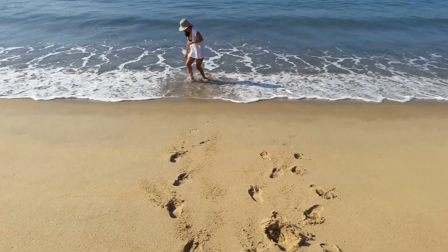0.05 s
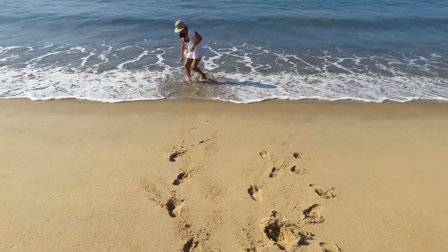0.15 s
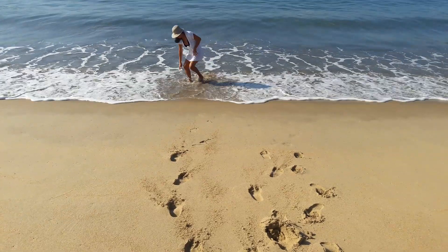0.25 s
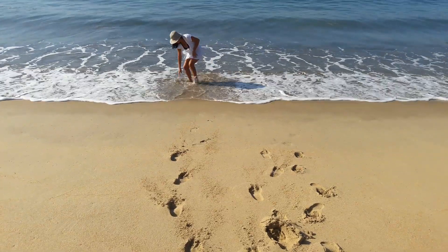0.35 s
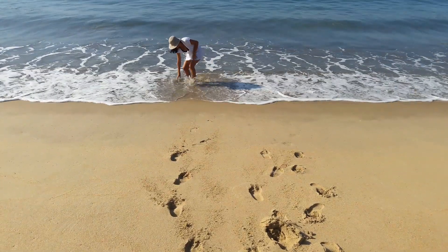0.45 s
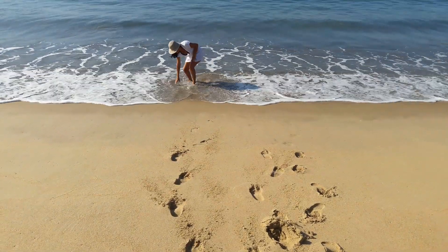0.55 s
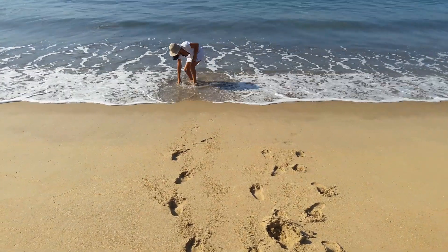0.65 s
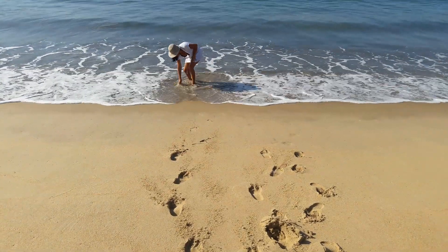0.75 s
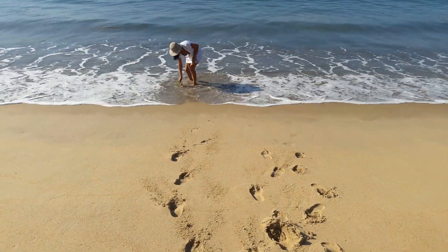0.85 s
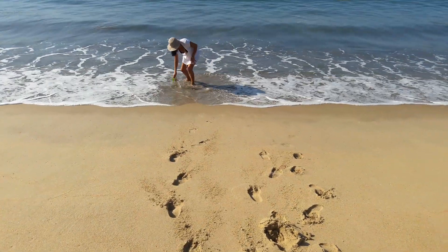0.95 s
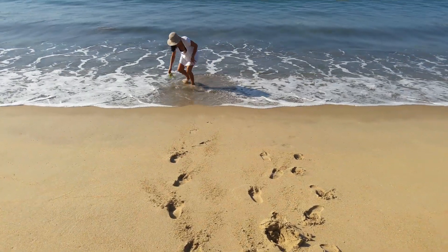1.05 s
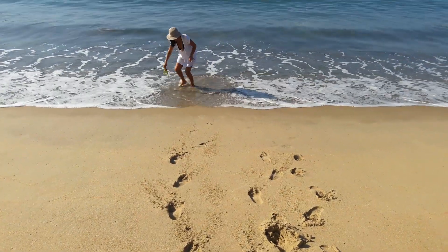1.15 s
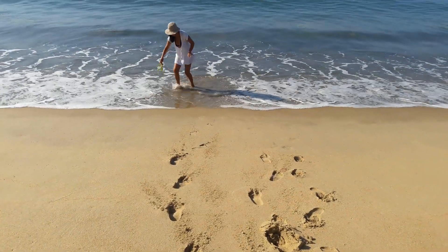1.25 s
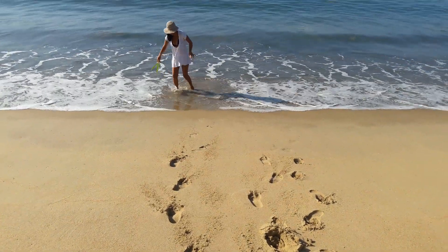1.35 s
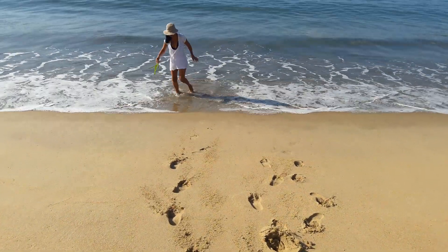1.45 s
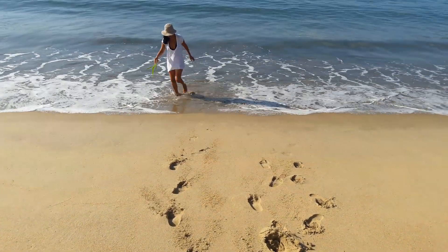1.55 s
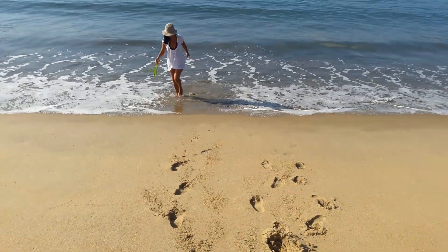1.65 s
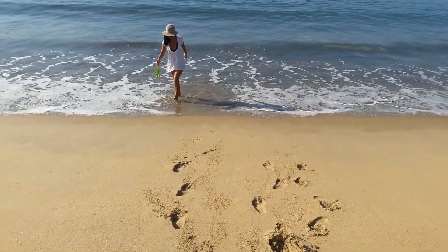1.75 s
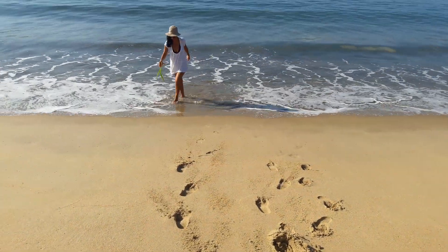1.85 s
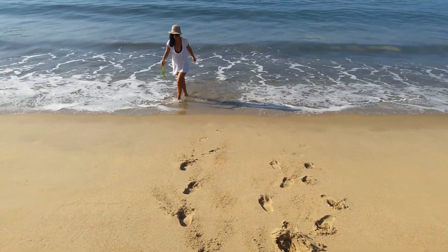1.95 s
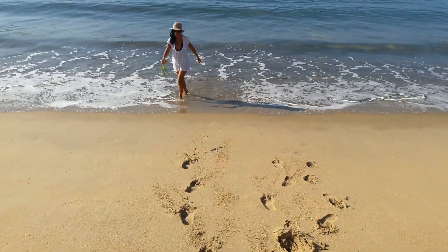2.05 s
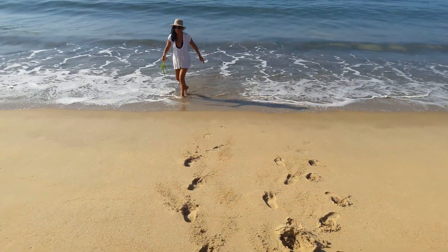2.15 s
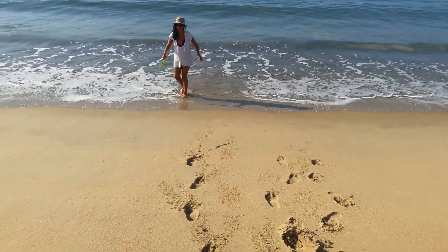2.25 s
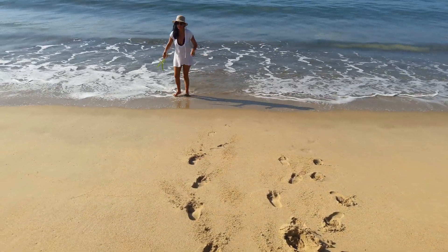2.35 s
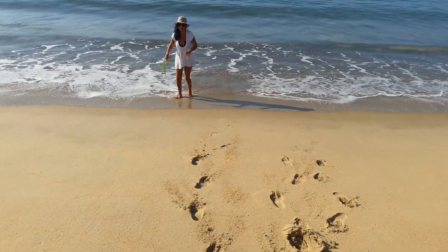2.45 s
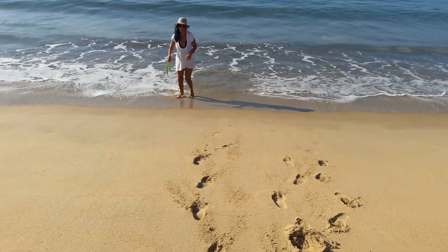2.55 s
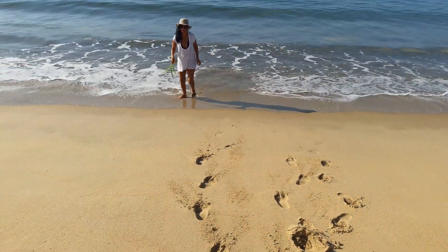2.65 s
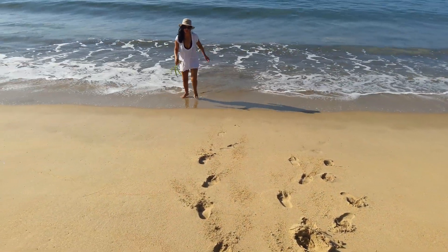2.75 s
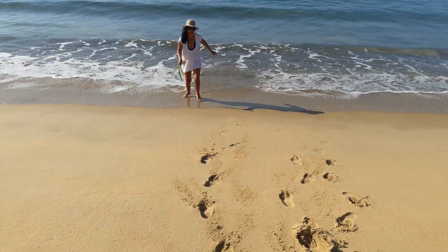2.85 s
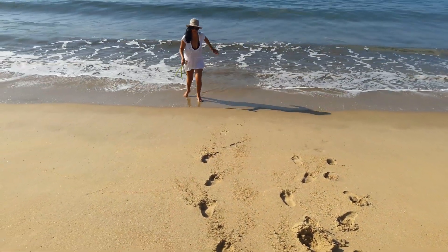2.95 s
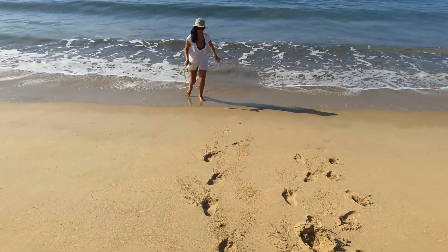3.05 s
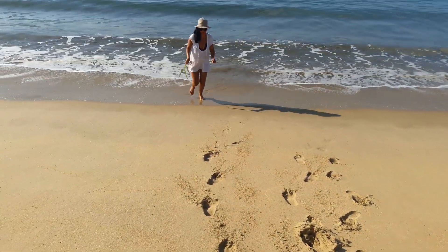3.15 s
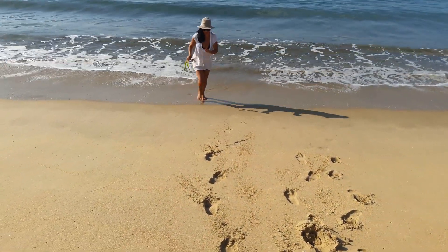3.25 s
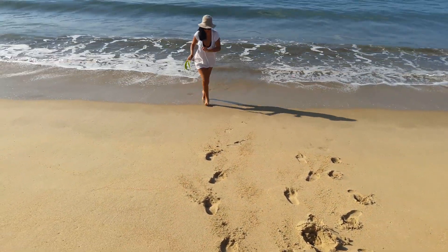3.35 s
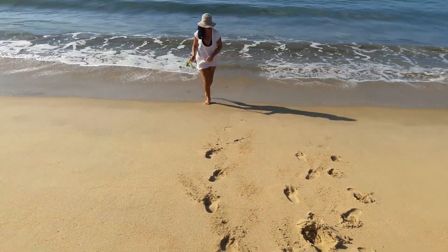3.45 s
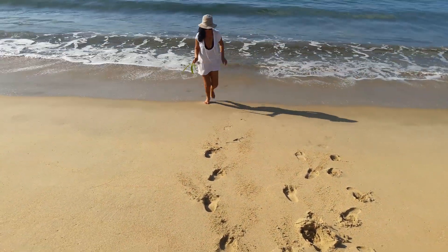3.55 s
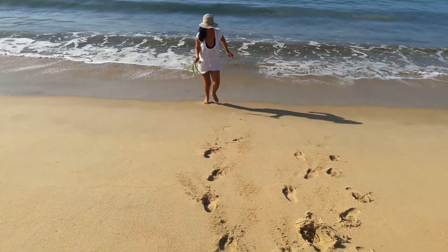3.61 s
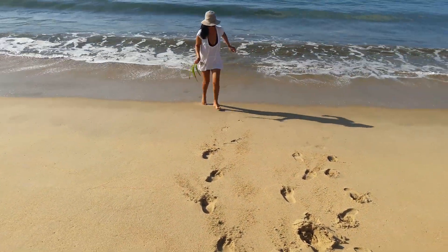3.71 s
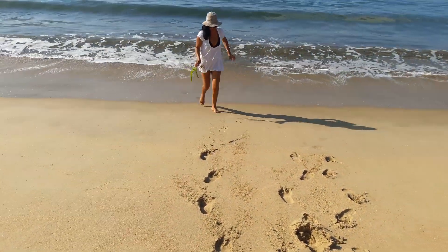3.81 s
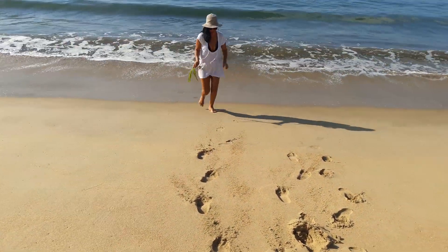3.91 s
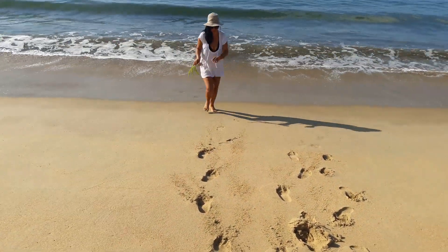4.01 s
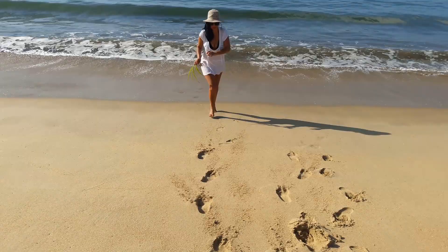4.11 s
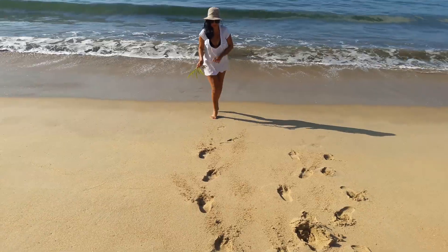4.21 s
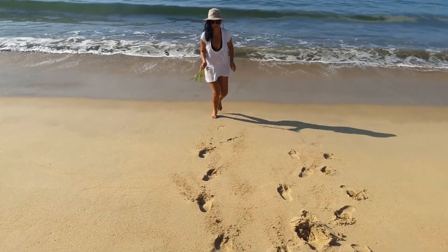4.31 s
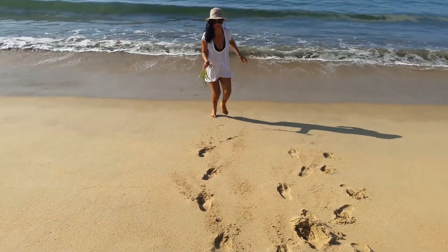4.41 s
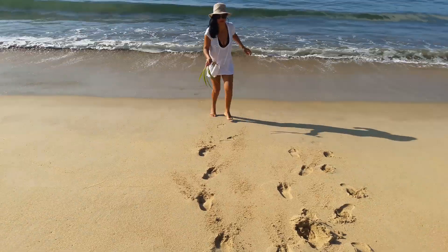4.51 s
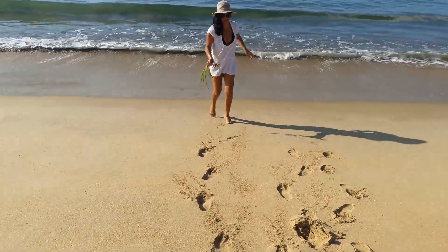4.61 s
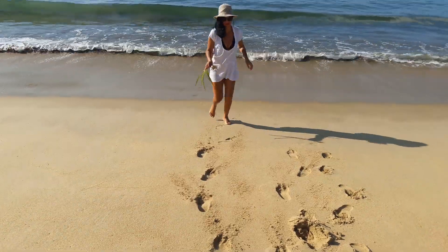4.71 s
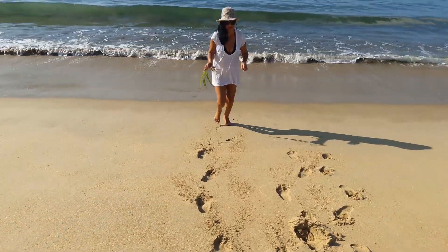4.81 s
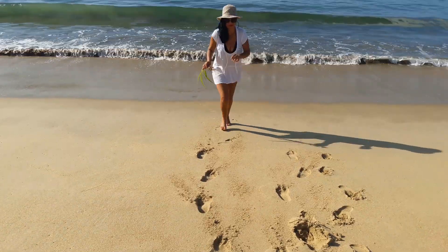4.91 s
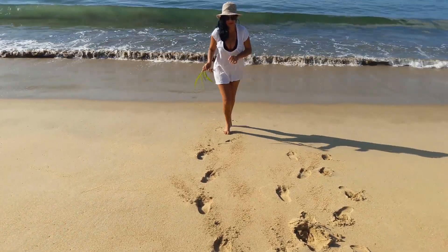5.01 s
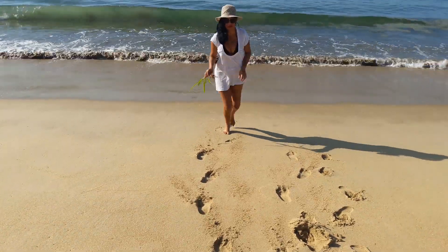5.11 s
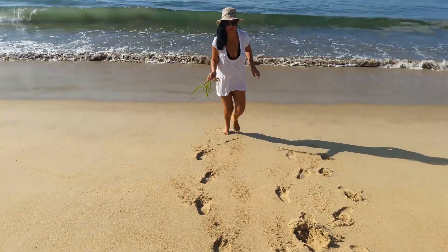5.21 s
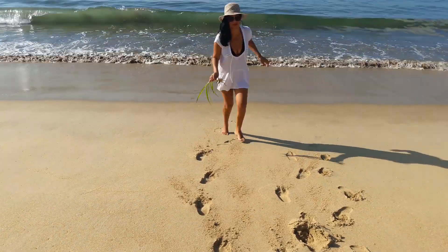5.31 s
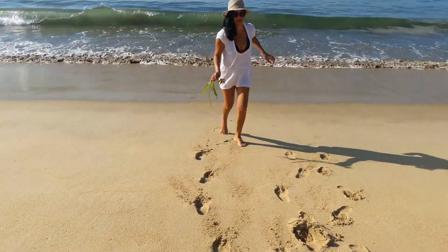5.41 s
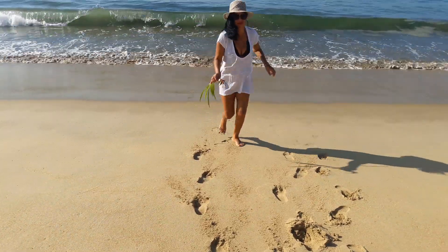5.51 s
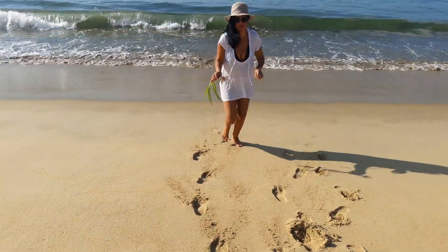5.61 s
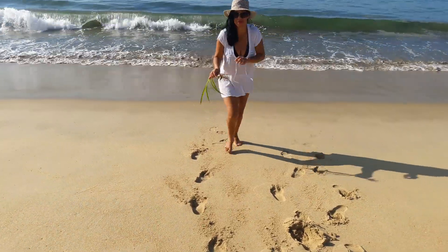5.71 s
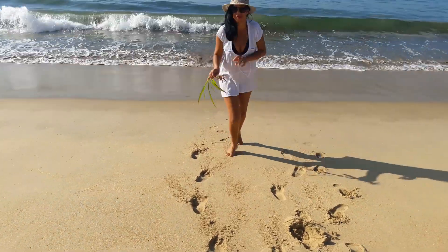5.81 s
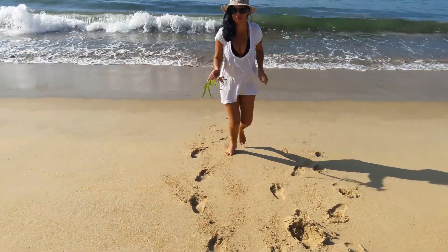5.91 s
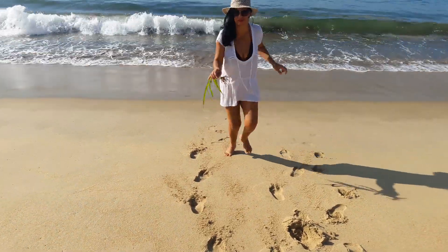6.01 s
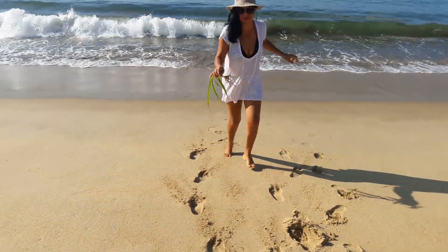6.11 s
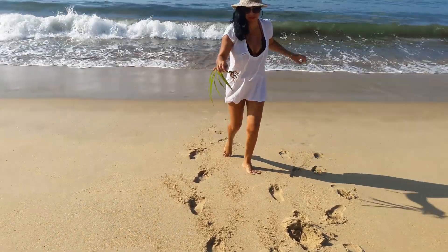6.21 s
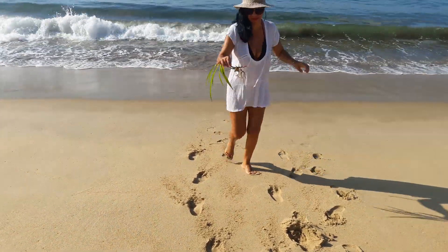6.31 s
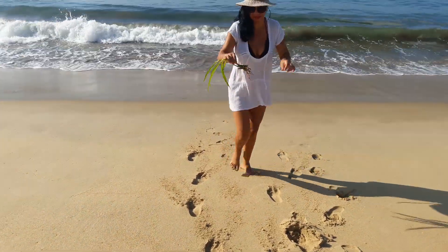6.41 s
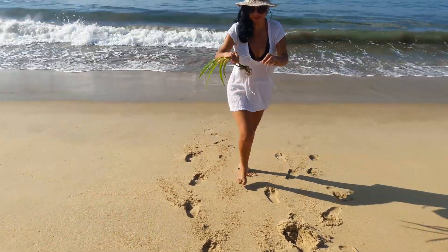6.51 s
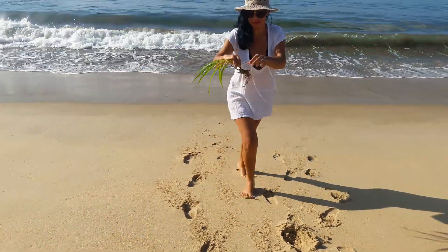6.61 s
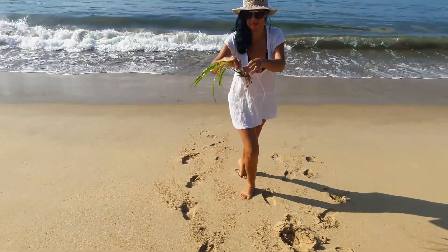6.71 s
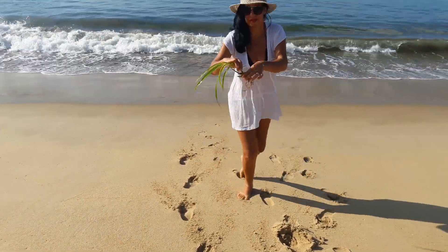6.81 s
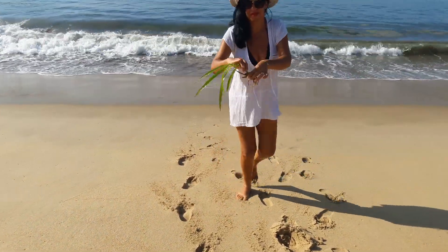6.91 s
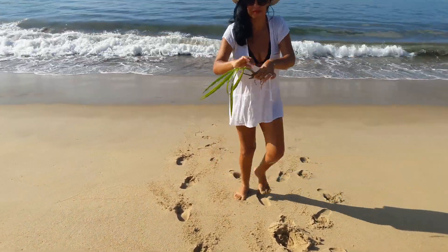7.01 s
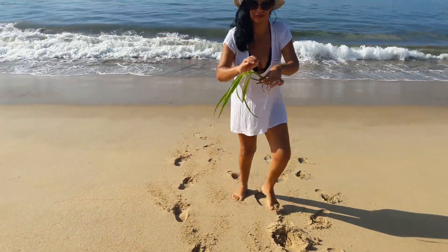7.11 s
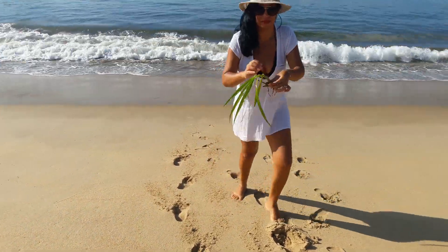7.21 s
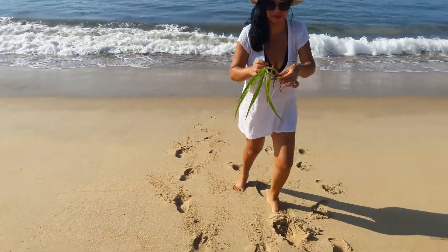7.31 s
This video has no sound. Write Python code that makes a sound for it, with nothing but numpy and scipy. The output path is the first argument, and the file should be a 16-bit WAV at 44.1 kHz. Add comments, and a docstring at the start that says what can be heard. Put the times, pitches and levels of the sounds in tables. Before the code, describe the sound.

Soft beach wash with small laps and plops thins out before a new wave gurgles, slaps down and crashes into loud, hissing whitewater.

```python
"""Surf on a sandy beach, a few metres from the waterline. A spent wave fizzes and laps round wading feet,
drains back over the sand, and the next wave curls, plops and breaks into a roar of bubbles and spray.
The water is ringing bubbles over coloured noise, plops are decaying tones, slaps are showers of clicks.
Draining water is noise with a short inverted echo; far surf, a light wind and the hiss of the small
microphone are coloured noise. The microphone port colours the treble."""
import sys
import numpy as np
from scipy import signal
from scipy.fft import rfft, irfft, next_fast_len
from scipy.io import wavfile

SR = 44100
rng = np.random.default_rng(int(sys.argv[2]) if len(sys.argv) > 2 else 0)


def dump_mix(stems):
    """Bounce the given channels to the path in sys.argv[1] as a 16-bit WAV at rate SR."""
    frames = np.atleast_2d(stems).T  # one column per channel
    limited = np.clip(frames, -1, 1)  # hard clip at full scale
    pcm = np.round(limited * 32767).astype(np.int16)
    wavfile.write(sys.argv[1], SR, pcm)


N = 324569
TIME = np.arange(N) / SR
BREAK_S = 5.216  # the new wave breaks

# how much of the lift from a collapsing crest each part takes: part -> share of the dB
COLLAPSE_SHARE = {"churn": 0.55, "fizz": .9, "boom": 0.62}


def from_db(db):
    """Decibels to gain."""
    return 10 ** (np.asarray(db) / 20)


def rms_one(x):
    """Scale to unit rms."""
    return x / np.sqrt(np.mean(x ** 2) + 1e-20)


def noise():
    """White noise for the whole scene."""
    return rng.standard_normal(N)


def filtered(x, order, hz, kind="low"):
    """Pass x through a Butterworth filter."""
    return signal.sosfilt(signal.butter(order, hz, kind, fs=SR, output="sos"), x)


def coloured(x, spectrum):
    """Shape x by a spectrum drawn over log frequency; rms 1."""
    hz, db = np.transpose(spectrum)
    size = next_fast_len(N)
    bins = np.maximum(np.fft.rfftfreq(size, 1 / SR), 1)
    gain = from_db(np.interp(np.log(bins), np.log(hz), db, left=-90, right=-90))
    return rms_one(irfft(rfft(x, size) * gain, size)[:N])


def drift(rate):
    """Smooth random wander that changes about rate times a second; spread 1."""
    step = 40  # samples between points of the slow curve
    r = np.exp(-2 * np.pi * rate * step / SR)
    settle = 2000  # points dropped while the filter settles
    kicks = rng.standard_normal(N // step + 2 + settle)
    slow = signal.lfilter([1], [1, -2 * r, r * r], kicks)[settle:]
    return np.interp(np.arange(N) / step, np.arange(len(slow)), rms_one(slow))


def bump(s, length):
    """A smooth rise and fall of height 1 around time s."""
    return np.exp(-np.minimum(((TIME - s) / length) ** 2, 50))


def add(out, s, sound):
    """Mix a short sound in at time s."""
    at = max(int(s * SR), 0)
    out[at:at + len(sound)] += sound[:max(N - at, 0)]


def hiss_at(hz, width_hz):
    """A noisy resonance around a pitch that may move; rms 1."""
    low = filtered(rng.standard_normal((2, N)), 2, width_hz / 2)
    phase = 2 * np.pi * np.cumsum(hz * np.ones(N)) / SR
    return rms_one(low[0] * np.cos(phase) + low[1] * np.sin(phase))


def new_wave(part):
    """Gain of one part of the breaking wave: it builds, holds, then changes at its own rate."""
    # (full after the break [s], full level [dB], rise [dB/s], hold [s], fall [dB/s]); negative falls grow
    envelopes = {"rumble": (0.28, -24.5, 14, 1.1, 4.3), "boom": (0.62, -32, 10.5, 0.5, 12),
                 "tumble": (.25, -32, 22, 0.5, -.5), "splash": (.0, -34.5, 26, 0.5, 3),
                 "fizz": (.0, -41, 24, 1.2, 4.5), "foam": (-0.5, -55.5, 12, 4, .5),
                 "backwash": (-0.77, -43, 13.5, 0.7, 70)}
    # when each part of the new wave is first heard: part -> time [s]
    entries = {"rumble": 3.25, "boom": 3.55, "tumble": 3.55, "splash": 4.7, "fizz": 4.7, "foam": 4.7,
               "backwash": 3.35}
    delay_s, full_db, rise, hold_s, fall = envelopes[part]
    t = TIME - BREAK_S - delay_s
    fade_in = np.clip((TIME - entries[part]) / 0.14, 0, 1)
    level_db = full_db - rise * np.maximum(-t, 0) - fall * np.maximum(t - hold_s, 0)
    return fade_in * from_db(level_db)


def spent_wave(part):
    """Gain of one part of the wave that has already run up the beach and is dying away."""
    # part -> (level at the start [dB], fall [dB/s])
    decays = {"rumble": (-51.5, 2.7), "boom": (-54.5, 1.7), "tumble": (-55, 6), "splash": (-56, 1.67),
              "fizz": (-57, 2.6), "foam": (-62, 3.9)}
    start_db, fall = decays[part]
    return from_db(start_db - fall * TIME)


def both_waves(part):
    """Gain of one part as the spent wave fades and the new one takes over."""
    return np.hypot(spent_wave(part), new_wave(part))


def collapse_db():
    """Lift in dB as one stretch of the crest after another falls and throws up spray."""
    # (time [s], lift [dB], length [s])
    collapses = [(4.875, 4.5, 0.12), (5.17, 2, 0.058), (5.294, 4, 0.088), (5.77, 3, 0.16), (6.253, 2, 0.21),
                 (7.19, 3, .07)]
    return sum(db * bump(s, length) for s, db, length in collapses)


def bubbles(low_hz, high_hz, per_s, cycles, size_db, clump_db, count=16):
    """Bubbles of many pitches and strengths are born in clumps; each rings for a few cycles."""
    out = np.zeros(N)
    for hz in np.geomspace(low_hz, high_hz, count):
        birth_chance = per_s / count / SR * from_db(clump_db * drift(8))
        born = np.flatnonzero(rng.random(N) < birth_chance)
        strength_db = size_db * np.minimum(rng.exponential(1, len(born)), 4)
        kicks = np.zeros(N)
        kicks[born] = from_db(strength_db) * rng.choice([-1, 1], len(born))
        # a two-pole resonator that falls 60 dB in the given cycles
        r = np.exp(-np.log(1000) * hz / (cycles * SR))
        w = 2 * np.pi * hz / SR
        ringing = signal.lfilter([1, 0, -1], [1, -2 * r * np.cos(w), r * r], kicks + 1e-18)
        out += np.sqrt(hz) * rms_one(ringing)
    return rms_one(out)


def water(near, spectrum, far_db, surge_db, surge_rate):
    """Near bubbles mix with the smooth wash of countless far ones; the whole surges unevenly."""
    far = coloured(noise(), spectrum)
    mix = coloured(near, spectrum) + from_db(far_db) * far
    return rms_one(mix * from_db(surge_db * drift(surge_rate)))


def rumble():
    """Clouds of air in the water ring low together."""
    # (frequency [Hz], level per Hz [dB])
    rumble_spectrum = [(30, -48), (60, -18), (85, -16.5), (120, -5), (180, -1.5), (250, 1.5), (370, -1),
                       (480, -7), (700, -8), (1500, -46)]
    clouds = bubbles(85.0, 544, per_s=400, cycles=12.2, size_db=2.0, clump_db=1.5, count=10)
    return both_waves("rumble") * water(clouds, rumble_spectrum, far_db=-0.5, surge_db=-0.63, surge_rate=17.0)


def churn():
    """Middle-sized bubbles gurgle as the water churns, harder as the crest collapses."""
    # (frequency [Hz], level per Hz [dB])
    churn_spectrum = [(150, -7), (350, 1), (550, -0.5), (850, -0.5), (1200, 1.5), (1600, 2), (2050, -1),
                      (2400, -11.5), (2900, -15), (5000, -34)]
    # how hard the water churns: (time [s], level [dB])
    churning = [(0, -44.5), (.3, -43), (.95, -48), (1.35, -47), (2.05, -49), (2.7, -47.5), (3.25, -49.5),
                (3.8, -44.5), (4.17, -43.5), (4.3, -38.5), (4.7, -35), (4.88, -29), (5.25, -25), (5.6, -29),
                (6.25, -26), (7.36, -28.5)]
    level_db = np.interp(TIME, *np.transpose(churning)) + COLLAPSE_SHARE["churn"] * collapse_db()
    gurgle = bubbles(394.4, 2540, per_s=1000, cycles=21, size_db=2.5, clump_db=2.5)
    return from_db(level_db) * water(gurgle, churn_spectrum, far_db=3.5, surge_db=0.62, surge_rate=2.7)


def splash():
    """Drops splash as short high rings, with the full lift of each collapse."""
    # (frequency [Hz], level per Hz [dB])
    splash_spectrum = [(1200, -37), (1900, 0.5), (2300, 0.5), (2700, -4), (3300, -8.5), (4200, -11),
                       (5200, -16), (6500, -20), (12000, -64)]
    drops = bubbles(1920, 5820, per_s=2200, cycles=18, size_db=1.0, clump_db=3, count=12)
    level = both_waves("splash") * from_db(collapse_db())
    return level * water(drops, splash_spectrum, far_db=0.0, surge_db=0.4, surge_rate=30)


def fizz(coarse_hz=10200, fine_s=0.5):
    """Foam fizzes; old foam lacks the finest bubbles, which build up after the break."""
    # (frequency [Hz], level per Hz [dB])
    fizz_spectrum = [(3000, -19), (5000, -10), (6300, 1), (7200, 1), (7900, -4), (9000, 0), (10300, -4.5),
                     (11700, -5), (13500, -4), (15600, -10.5)]
    foam = bubbles(5500, 14600, per_s=4500, cycles=13.0, size_db=0.5, clump_db=3, count=10)
    fresh = water(foam, fizz_spectrum, far_db=1.0, surge_db=0.46, surge_rate=28)
    old = filtered(fresh, 1, coarse_hz)
    fine = np.clip((TIME - BREAK_S) / fine_s, 0, 1)
    level = both_waves("fizz") * from_db(COLLAPSE_SHARE["fizz"] * collapse_db())
    return level * (fine * fresh + (1 - fine) * old)


def surf():
    """Air clouds rumble under churn, splash and fizz, which waver together."""
    return rumble() + (churn() + splash() + fizz()) * from_db(0.79 * drift(14.4))


def boom():
    """Falling water booms: deep noise that swells with each collapse."""
    # (frequency [Hz], level per Hz [dB])
    boom_spectrum = [(25, -40), (50, -17), (80, -0.5), (120, 3), (170, 1), (260, -3.5), (600, -59)]
    level = both_waves("boom") * from_db(COLLAPSE_SHARE["boom"] * collapse_db())
    return level * coloured(noise(), boom_spectrum)


def tumble():
    """Whitewater tumbles behind the falling water: big bubbles in a strong wash."""
    # (frequency [Hz], level per Hz [dB])
    whitewater_spectrum = [(350, -38), (520, -15), (630, 0), (900, 3.5), (1100, -2.5), (1500, -23.5),
                           (2200, -2), (4000, -50)]
    big_bubbles = bubbles(544, 1600, per_s=700, cycles=23, size_db=4.5, clump_db=2, count=10)
    return both_waves("tumble") * water(big_bubbles, whitewater_spectrum, far_db=8.0, surge_db=2.0, surge_rate=19)


def foam_rings(flicker_db=1.4):
    """The sheet of foam rings in two narrow flickering bands, and the low one flares."""
    # pitches at which the foam sheet rings, low then high: (pitch [Hz], width [Hz], level [dB])
    rings = [(4045, 350, -2.5), (10380, 1100, -2.5)]
    # flares of the low ring: (time [s], level [dB], length [s])
    flare_events = [(0.624, -62, 0.067), (1.537, -61, .025), (2.533, -63, 0.046), (6.97, -44, 0.13)]
    low, high = [from_db(db) * hiss_at(hz, width_hz) for hz, width_hz, db in rings]
    flares = sum(from_db(db) * bump(s, length) for s, db, length in flare_events)
    ringing = both_waves("foam") * (low + high) + flares * low
    return ringing * from_db(flicker_db * drift(22))


def jet(width_hz=230, sag_hz_per_s=2400):
    """Each jet of the plunging lip strikes the water with a narrow hiss that falls in pitch."""
    # (time [s], level [dB], length [s], pitch [Hz])
    jets = [(5.28, -33, 0.062, 2300), (5.615, -25, 0.01, 2093), (5.692, -31, 0.038, 2190),
            (5.747, -23, 0.023, 1890)]
    out = np.zeros(N)
    for s, db, length, hz in jets:
        falling_hz = hz - sag_hz_per_s * (TIME - s)
        out += from_db(db) * bump(s, length) * hiss_at(falling_hz, width_hz)
    return out


def backwash(echo_share=0.29, lag_at_break_ms=0.695, slide_ms_per_s=0.043):
    """Hiss of draining water, combed by a short inverted echo whose lag slowly shortens."""
    # (frequency [Hz], level per Hz [dB])
    sand_spectrum = [(600, -34), (1100, -14), (1500, 0.5), (2050, 3.5), (2500, 3), (3400, -6),
                     (5000, -13.5), (6500, -17.5), (10000, -18), (12000, -25), (16000, -35)]
    lag_ms = lag_at_break_ms + slide_ms_per_s * (BREAK_S - TIME)
    hiss = coloured(noise(), sand_spectrum)
    echo = np.interp(TIME - lag_ms / 1000, TIME, hiss)
    return new_wave("backwash") * rms_one(hiss - echo_share * echo)


def plops(rise=0.086, snap_db=-1, snap_hz=2000):
    """A cavity snaps shut with a dull click and rings, rising as it nears the surface; a drop only ticks."""
    # pockets of air closing in the water: (time [s], level [dB], pitch [Hz])
    pockets = [(.652, -31, 256), (1.383, -32, 640), (1.492, -31, 436), (1.548, -31.5, 640),
               (1.590, -35, 620), (1.632, -38, 1900), (2.461, -30, 2040), (2.470, -34, 1900),
               (2.515, -36, 1380), (4.281, -22, 308), (4.320, -24.5, 435), (4.429, -26, 250),
               (4.481, -16, 370), (4.594, -21, 247), (4.634, -24, 660), (5.757, -28, 228),
               (5.848, -15, 253)]
    # single drops tick on the water: (time [s], level [dB], pitch [Hz])
    ticks = [(4.69, -15.5, 1300), (4.812, -19, 4950)]
    # 60 dB decay: 51 ms for a pocket of 250 Hz, less for smaller, higher ones
    events = [(s, db, hz, 0.051 * (250 / hz) ** 0.47) for s, db, hz in pockets]
    events += [(s, db, hz, 0.0028) for s, db, hz in ticks]
    out = np.zeros(N)
    for s, db, hz, t60 in events:
        t = TIME[:int(1.5 * t60 * SR)]
        decay = np.exp(-np.log(1000) * t / t60)
        tone = np.sin(2 * np.pi * hz * t * (1 + rise * t / t60)) * decay
        snap = filtered(signal.unit_impulse(len(t)), 6, snap_hz)
        add(out, s, from_db(db) * (tone + from_db(snap_db) * snap / snap.max()))
    # small cavities radiate no deep bass
    return filtered(out, 2, 100, "high")


def slaps(attack_s=0.007, drops_per_s=1800, spray_cut_hz=8900):
    """A sheet of water falls back as a short shower of drops, with a little fine spray."""
    # (time [s], level [dB], length [s], centre [Hz], fine spray relative to the shower [dB])
    sheets = [(0.043, -38, 0.021, 1890, -16), (0.239, -36.5, 0.03, 900, -24.5),
              (0.295, -33.5, 0.015, 1220, -15), (0.654, -42, 0.036, 1590, -11),
              (1.299, -44, 0.033, 1820, -14), (1.55, -45, 0.023, 900, -13), (1.624, -45, 0.031, 2130, -10),
              (2.273, -40, 0.022, 900, -25), (2.463, -42.5, 0.023, 1890, -15),
              (2.502, -49.5, 0.064, 2380, -6), (4.283, -30, 0.03, 1820, -22),
              (4.375, -38, 0.037, 1700, -27), (5.265, -29.5, 0.087, 2090, -9),
              (5.757, -25.5, 0.033, 2420, -8), (5.872, -27, 0.069, 900, -20), (6.243, -33, 0.11, 820, -22)]
    out = np.zeros(N)
    for s, db, length, hz, spray_db in sheets:
        t = TIME[:int(4 * length * SR)]
        drops = rng.standard_normal(len(t)) * (rng.random(len(t)) < drops_per_s / SR)
        shower = filtered(drops, 3, [hz * 0.68, hz * 1.26], "band")
        spray = filtered(drops, 2, spray_cut_hz)
        swell = (1 - np.exp(-t / attack_s)) * np.exp(-(t / length) ** 2)
        add(out, s, from_db(db) * swell * (rms_one(shower) + from_db(spray_db) * rms_one(spray)))
    return out


def wind(breeze_db=-69):
    """A breeze and a few gusts buffet the microphone in soft lumps."""
    # (frequency [Hz], level per Hz [dB])
    buffet_spectrum = [(12, -28), (25, -17), (45, 3), (70, 1), (120, 4), (400, -40), (1500, -80)]
    # (time [s], level [dB], length [s])
    gusts = [(5.33, -48, .14), (6.25, -52, .2), (6.743, -54, 0.15), (7.34, -44, .1)]
    strength = from_db(breeze_db) + sum(from_db(db) * bump(s, length) for s, db, length in gusts)
    lumps = from_db(0.8 * drift(5.6))
    return strength * rms_one(coloured(noise(), buffet_spectrum) * lumps)


def shore():
    """Waves far along the beach blend into a steady low wash, over the microphone's own thin, steady hiss."""
    # (frequency [Hz], level per Hz [dB])
    shore_spectrum = [(20, -32), (45, -16), (90, -4.5), (125, -7.5), (165, 1.5), (230, -1.5), (310, -3),
                      (470, -3), (750, -13), (1600, -16.5), (3000, -39), (5200, -65), (11000, -35),
                      (13200, -34), (15600, -40)]
    return from_db(-50.5) * coloured(noise(), shore_spectrum)


def scene():
    """The sea, the wind and the microphone's hiss, in one channel."""
    breaking = surf() + boom() + tumble() + foam_rings() + jet()
    details = backwash() + plops() + slaps()
    return (breaking + details + wind() + shore())[None]


def record(dry):
    """The microphone port rings at a few treble pitches; the top is cut."""
    # resonances of the port: (pitch [Hz], width [Hz], boost [dB])
    port = [(3920, 760, 3.5), (6790, 670, 7), (8440, 480, 6), (12800, 1200, 1.5)]
    for hz, width_hz, db in port:
        ring = signal.lfilter(*signal.iirpeak(hz, hz / width_hz, fs=SR), dry)
        dry = dry + (from_db(db) - 1) * ring
    # steep low-pass at 15.7 kHz
    return signal.sosfilt(signal.ellip(12, 0.1, 80, 15700, fs=SR, output="sos"), dry)


dry = scene()
out = record(dry)
dump_mix(out)
```